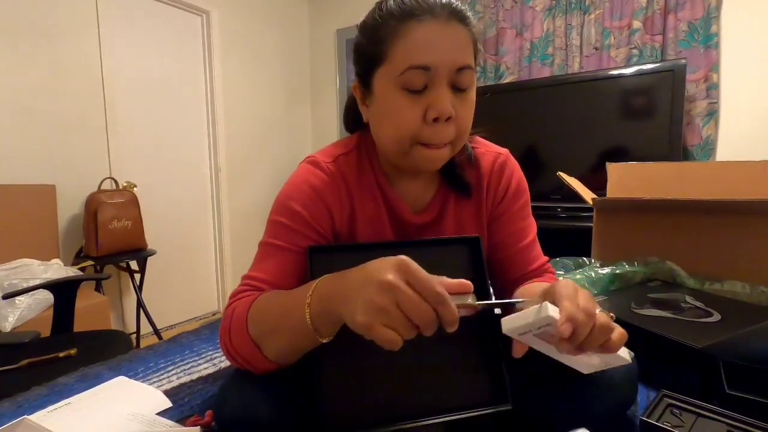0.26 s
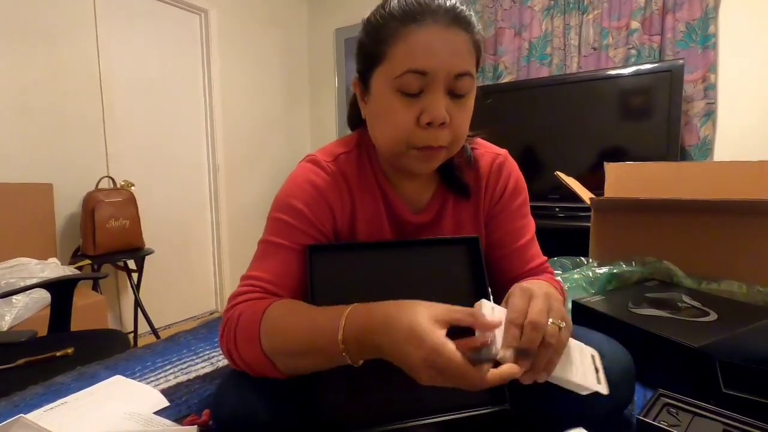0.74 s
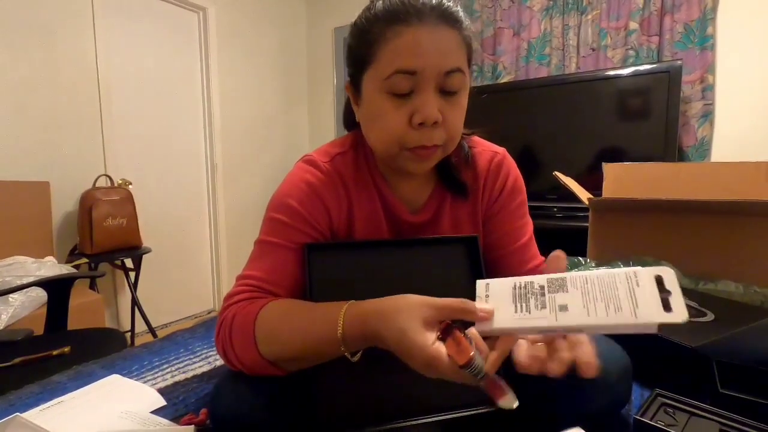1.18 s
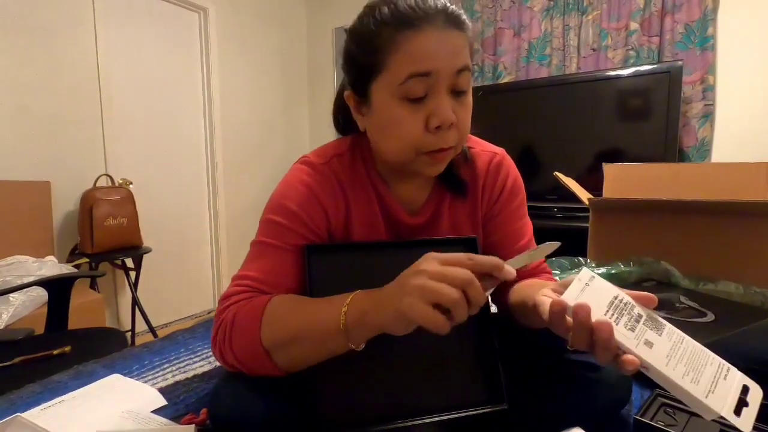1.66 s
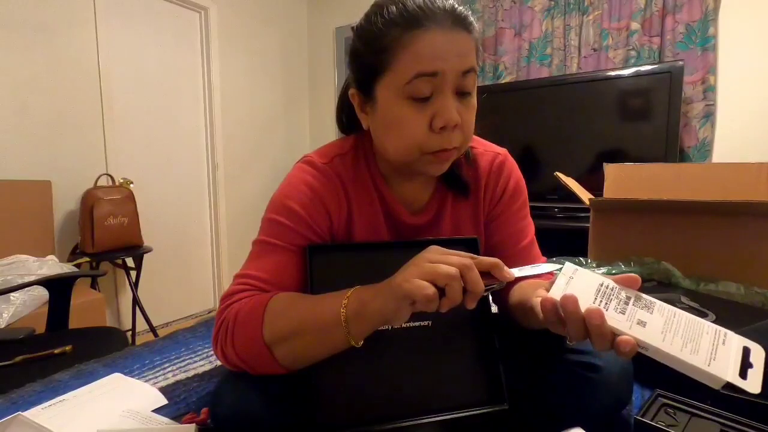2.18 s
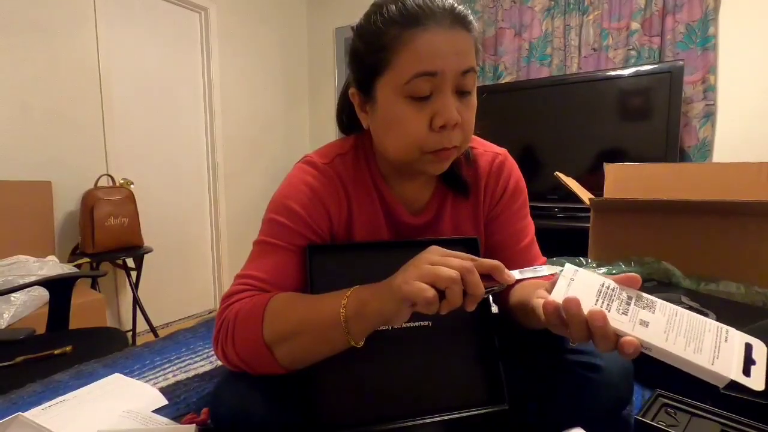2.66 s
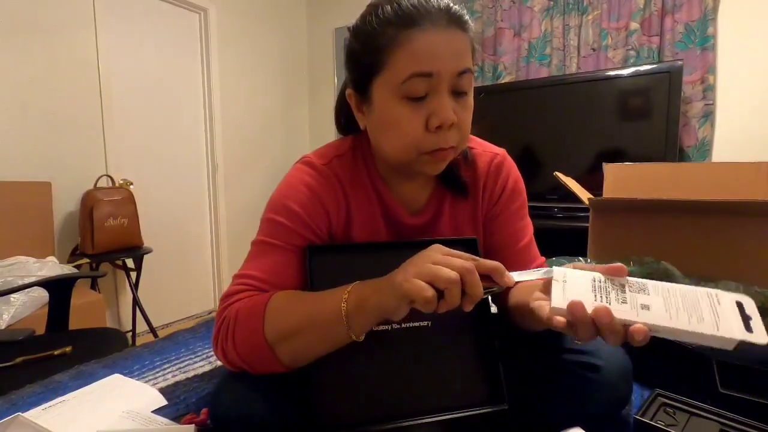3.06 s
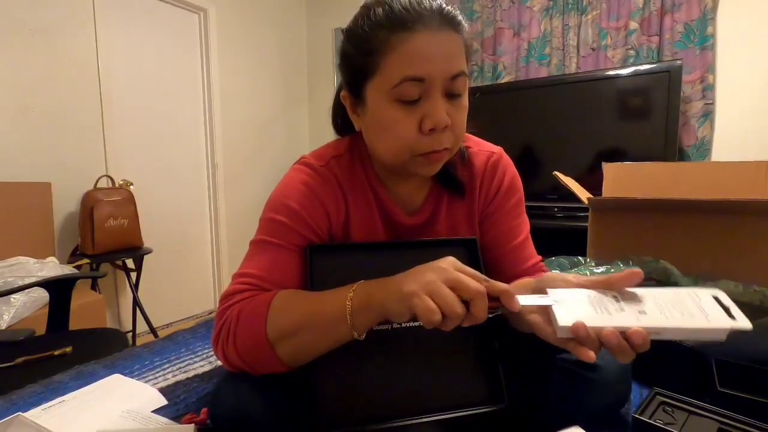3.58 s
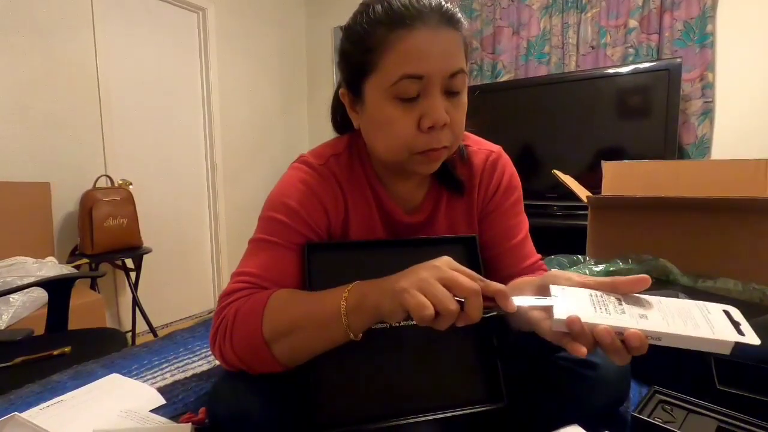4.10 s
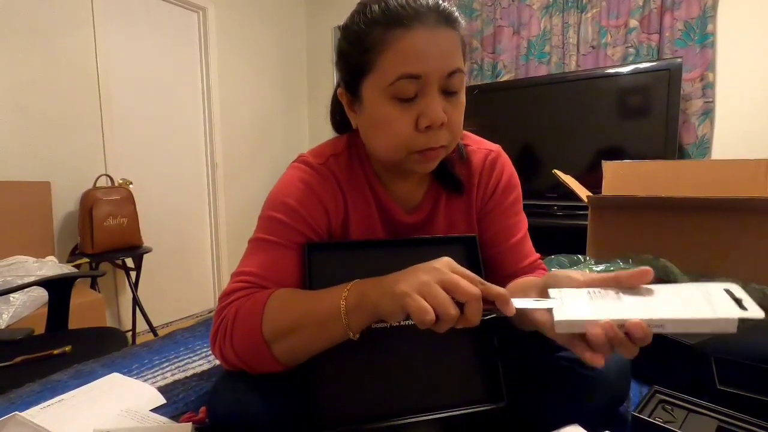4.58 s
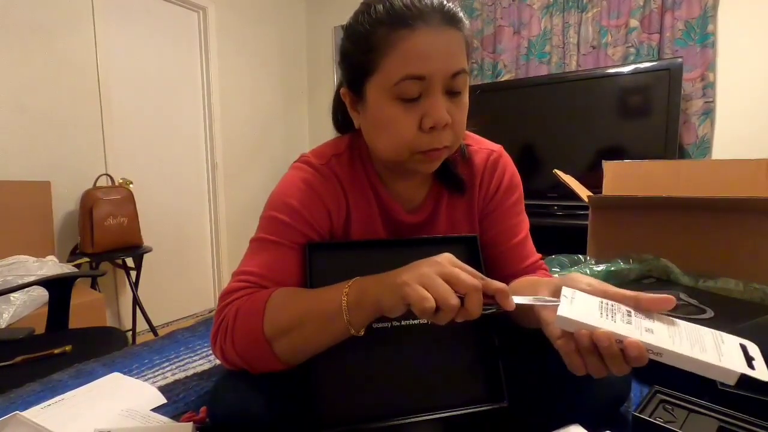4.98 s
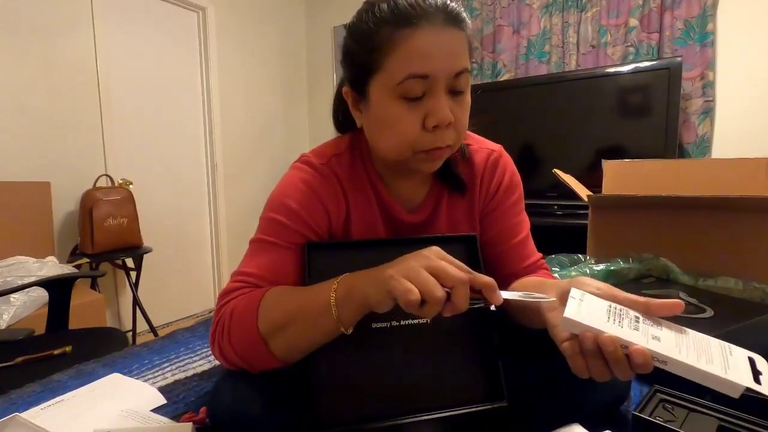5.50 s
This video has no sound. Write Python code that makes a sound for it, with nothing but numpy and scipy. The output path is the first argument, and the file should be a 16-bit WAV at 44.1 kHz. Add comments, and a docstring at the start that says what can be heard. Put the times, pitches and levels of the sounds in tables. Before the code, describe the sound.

Hands turn a small cardboard box, making dry rubs and light hollow taps, with one firmer knock as it lands in the palm. A knife tip ticks and scratches at the seal. After a lull, the scraping resumes and the seal gives with one sharp, loud, click-like rip. A few faint scratches and ticks follow. The sound is close, in a furnished room with faint hiss and low rumble.

```python
"""Opening a cardboard box

Hands turn a small box and work a knife tip along its seal in a furnished room. Friction and light
impacts excite the resonances of the hollow box; once, the seal tears in a quick run of slips.
Two close microphones receive this with brief reverberation, over faint hiss and an uneven low rumble."""
import sys
import numpy as np
from scipy import signal
from scipy.io import wavfile
from scipy.ndimage import uniform_filter1d

SR = 44100
rng = np.random.default_rng(int(sys.argv[2]) if len(sys.argv) > 2 else 0)


def persist_wave(psi):
    """Save psi, clipped to +-1, as 16-bit WAV."""
    counts = np.round(np.clip(psi, -1, 1) * 32767).astype(np.int16)
    wavfile.write(sys.argv[1], SR, np.atleast_2d(counts).T)


N = 253134
HZ = np.fft.rfftfreq(4096, 1 / SR)

# spectrum of the background hiss: f/Hz, relative level/dB
HISS_SPECTRUM = [(53, -34), (90, -7), (239, -3), (303, -10), (345, -10), (385, -12), (510, -14.5),
                 (633, -17), (998, -18), (1510, -18.5), (1640, -22), (6160, -35.5), (16000, -48.5)]
# likeness of the hiss at left and right: f/Hz, correlation
HISS_CORRELATION = [(60, -0.64), (180, 0.54), (550, 0.0072), (1650, 0.26), (4970, -0.082), (15000, -0.51)]
# slow drift of the low murmur: t/s, relative level/dB
MURMUR_DRIFT = [(0.0, -64), (0.45, -66), (1.28, -65), (1.73, -61.5), (2.46, -66), (3.66, -65.5), (4.0, -68),
                (4.91, -65), (5.18, -68), (5.74, -65)]
# envelope of the rumble: t/s, level/dB
RUMBLE_ENVELOPE = [(0.0, -58), (0.4, -63.5), (0.94, -54), (1.04, -75), (1.18, -60), (1.71, -58.5),
                   (1.74, -68), (2.24, -45), (2.75, -68), (2.93, -59), (5.74, -62)]
# spectrum of the rumble: f/Hz, relative level/dB
RUMBLE_SPECTRUM = [(8.8, -37.5), (15, -1.5), (32, 5.5), (49, 6.5), (61, -12), (76, -22), (100, -49.5),
                   (130, -46), (220, -120)]
# resonances of the box: f/Hz, width/Hz, level/dB
BOX_MODES = [(263, 450, -16), (731, 330, 3.5), (800, 110, 4.5), (912, 160, 3.5), (1095, 240, 1.5),
             (1319, 220, 1), (2140, 910, -2), (3060, 250, -4), (3544, 450, -10.5), (4330, 350, -10),
             (6050, 1200, -7.5)]
# response of the box between resonances: f/Hz, level/dB
BOX_BROADBAND = [(200, -35.5), (520, -25.5), (700, -6.5), (1500, -4), (4000, -3), (8000, -10.5),
                 (16000, -27)]
# strokes of finger or blade: peak t/s, rise/s, fall/s, level/dB,
# then hollow ring/dB, fizz/dB and rasp/dB relative to that level, rasp f/Hz
FRICTION_STROKES = [(0.335, 0.068, 0.052, -64.5, -9.5, -8, -1, 1440),
                    (0.47, 0.063, 0.086, -60.5, -15, -7, -2.5, 1890),
                    (0.69, 0.056, 0.089, -47.5, -19, -4.5, -8.5, 1780),
                    (0.79, 0.09, 0.096, -48, -20.5, -12.5, -7, 2010),
                    (0.96, 0.058, 0.096, -50.5, -17.5, -10, -10, 1720),
                    (1.045, 0.029, 0.044, -48.5, -13.5, -8, -7.5, 1530),
                    (1.16, 0.077, 0.15, -68, -4, -8, -2, 1500),
                    (1.45, 0.049, 0.047, -54.5, -10, -4.5, -5, 1830),
                    (1.55, 0.059, 0.075, -60, -5, 0, -7, 2010), (1.74, 0.11, 0.044, -69, -14, 3, -10, 2000),
                    (1.87, 0.066, 0.13, -74, 0, -10, 0, 1510),
                    (3.045, 0.033, 0.033, -60, -1.5, -13, -3, 2370),
                    (3.10, 0.042, 0.064, -55, -7.5, -10.5, -5.5, 2300),
                    (3.265, .02, .015, -60, -8, -10, -6, 2000),
                    (3.294, .012, .018, -47, -8.5, -13, -9, 1700),
                    (3.36, .06, 0.052, -52.5, -14.5, -9.5, -9.5, 1736),
                    (3.50, 0.12, 0.054, -69.5, -0.5, -7.5, -4, 1500),
                    (3.557, .025, .02, -70, 13, -5, -4, 1390),
                    (3.615, .03, 0.021, -63, -7.5, -3, -3.5, 1803),
                    (3.734, 0.015, 0.011, -54, -7.5, -10, -2, 1790),
                    (4.522, .02, .02, -68.5, -9, -22, -8, 2195),
                    (4.669, 0.033, 0.034, -59.5, 0, -8, -5.5, 1980),
                    (4.738, 0.046, 0.033, -55, -10.5, -10.5, -3, 2020),
                    (4.783, .012, 0.0091, -65.5, 3.5, -9, 6, 1940),
                    (4.99, 0.045, .04, -69.5, -6, -4.5, -6, 2000),
                    (5.07, 0.029, 0.033, -73, 8, -7, 0, 1502),
                    (5.37, 0.076, 0.067, -74, -9, -4.5, -3, 2100),
                    (5.565, .02, 0.036, -67, 4, -9, -20, 2000)]
# light impacts: t/s, ring level/dB, ring f/Hz, contact decay/ms, snap level/dB, snap f/Hz
IMPACTS = [(0.3372, -49, 1430, 2.3, -56, 3500), (0.4161, -54, 2100, 1.3, -54, 3950),
           (0.569, -47, 1810, 1.2, -45, 3920), (0.5888, -45.5, 2520, 1.7, -49, 3200),
           (0.6189, -42, 2580, 0.4, -26, 6060), (0.7272, -33, 1800, 1.8, -30, 3670),
           (1.051, -25.5, 970, 1.5, -39, 3120), (1.1538, -47, 1480, 1.9, -50, 3600),
           (1.409, -47, 720, 3.2, -33.5, 3560), (1.427, -37, 1510, 2.1, -57, 7300),
           (1.4811, -45, 780, 1.5, -43, 3400), (1.5184, -37, 2030, 1.8, -50, 6030),
           (1.541, -41, 2110, 1.1, -39.5, 3480), (1.589, -37, 1950, 0.75, -52, 3160),
           (1.6086, -74, 600, 5.3, -39, 6000), (1.6758, -72, 730, 2.5, -43.5, 6370),
           (1.712, -72, 970, 3.3, -36, 5940), (1.7501, -55, 2480, 4.1, -38, 5600),
           (1.768, -64, 955, 1.9, -48, 6200), (1.8473, -54, 1320, 1.5, -49.5, 5200),
           (1.8698, -45.5, 1450, 1.4, -51, 4100), (1.9213, -61, 2800, 3.5, -51, 7400),
           (2.24, -52, 1300, 1.3, -72, 3500), (2.7517, -52, 825, 1.3, -57, 3480),
           (3.036, -48, 2340, 1.5, -51, 4630), (3.215, -62, 950, 1.5, -54, 4600),
           (3.2767, -39, 2830, 1.5, -33, 3140), (3.2908, -35.5, 1690, 5.3, -35.5, 4040),
           (3.4844, -48.5, 1790, 1.5, -55.5, 4100), (3.514, -53, 1940, 1.5, -55, 6200),
           (3.714, -57.5, 1695, 1.5, -52, 4570), (4.0945, -75, 1586, 1.5, -56.5, 3570),
           (4.2076, -43.5, 830, 3.8, -54, 3225), (4.2719, -80, 603, 1.4, -59, 3260),
           (4.5225, -54, 2310, 1.7, -51.5, 3500), (4.6372, -59, 800, 5.1, -60, 3170),
           (4.65, -52, 890, 1.0, -41, 5210), (4.782, -47, 1900, 4, -55, 3210),
           (5.0572, -56.5, 980, 1.3, -69, 3600), (5.4171, -51, 2120, 1.8, -59, 3294),
           (5.55, -45, 790, 1, -51, 3710), (5.561, -41.5, 2080, 1.94, -40.5, 4120)]
# resonances of the blade: f/Hz, width/Hz, relative level/dB
BLADE_MODES = [(4700, 59, -3.5), (6100, 120, -3), (7300, 160, 1)]
# the box lands in the palm: t/s, level/dB, f/Hz
PALM_BUMPS = [(1.052, -43, 220), (1.409, -45, 165)]
# the seal tears in two pulls: t/s, crackle level/dB, hollow ring/dB relative to the crackle
TEAR_ENVELOPE = [(3.7365, -20, -7.5), (3.743, -18, -7.5), (3.754, -11, -5.5), (3.7584, -20, -14),
                 (3.766, -14.5, -3), (3.772, -13, -7.5), (3.778, -9.5, -10), (3.78, -25.5, -4.5),
                 (3.79, -28.5, -2)]
# phase of the direct sound, left relative to right: f/Hz, phase/rad
LEFT_PHASE_SHIFT = [(100, 0.38), (1000, -0.35), (4000, -1.3), (8000, -1.2), (16000, -1.4)]
# sound scattered by hands and lap: f/Hz, amplitude share
SCATTERED_SHARE = [(1000, 0.5), (3000, 0.2), (6000, 0.8), (12000, 1)]
# reverberation time of the room: f/Hz, T60/s
REVERB_TIME = [(150, 0.11), (700, 0.27), (2000, 0.31), (5000, 0.3), (12000, 0.25)]
# spectrum of the echoes: f/Hz, level/dB
ECHO_SPECTRUM = [(300, -2), (1000, -11), (2000, -7), (3500, -11.5), (5500, -4.5), (10000, -5.5)]


def gain_of(db):
    return 10 ** (np.asarray(db) / 20)


def unit_rms(x):
    return x / np.sqrt(np.mean(x ** 2) + 1e-20)


def with_peak(x, db):
    return gain_of(db) * x / abs(x).max()


def curve_at(points, hz):
    f, value = np.transpose(points)
    return np.interp(np.log(hz + 1), np.log(f + 1), value)


def add(mix, start_s, sound):
    part = mix[round(start_s * SR):][:len(sound)]
    part += sound[:len(part)]


def band(x, lo_hz, hi_hz):
    return signal.sosfiltfilt(signal.butter(3, [lo_hz, hi_hz], "bandpass", fs=SR, output="sos"), x)


def impulse_response(gain):
    """Minimum phase gives the promptest response that has this gain on the HZ grid."""
    log_gain = np.log(np.maximum(np.r_[gain, gain[-2:0:-1]], 1e-5))
    return np.fft.ifft(np.exp(log_gain - 1j * signal.hilbert(log_gain).imag)).real[:len(gain)]


def stereo_noise(spectrum, correlation, patchy_db, size):
    """Partial coherence: two channels share part of a random spectrum whose level varies in patches."""
    frames, hz = 4 * N // size + 5, np.fft.rfftfreq(size, 1 / SR)
    a, b, c, d, patches = rng.standard_normal((frames, len(hz), 5)).T
    patches = unit_rms(uniform_filter1d(uniform_filter1d(patches, 10, axis=0), 8, axis=1))
    shared = curve_at(correlation, hz)[:, None]
    left, independent = a + 1j * b, c + 1j * d
    spectra = np.array([left, shared * left + np.sqrt(1 - shared ** 2) * independent])
    spectra *= gain_of(curve_at(spectrum, hz)[:, None] + patchy_db * patches)
    return unit_rms(signal.istft(spectra, nperseg=size, noverlap=3 * size // 4)[1][:, :N])


def background():
    """Ambient noise: steady hiss, with slow amplitude modulation of its low murmur and of a rumble."""
    t = np.arange(N) / SR
    hiss = gain_of(-61.5) * stereo_noise(HISS_SPECTRUM, HISS_CORRELATION, patchy_db=1.15, size=2048)
    drift_db = np.interp(t, *np.transpose(MURMUR_DRIFT))
    murmur = band(hiss, 80, 500)
    hiss += murmur * (gain_of(drift_db - drift_db.mean() + 0.88) - 1)
    rumble = stereo_noise(RUMBLE_SPECTRUM, [(20, .97), (100, 1.0)], patchy_db=0.26, size=8192)
    rumble_db = np.interp(t, *np.transpose(RUMBLE_ENVELOPE))
    return hiss * gain_of([[-.3], [.3]]) + rumble * gain_of(rumble_db + [[.4], [-.4]])


def modal_power(modes):
    """Resonance peaks add in power."""
    return sum(gain_of(db) ** 2 / (1 + (2 * (HZ - f) / width) ** 2) ** 2 for f, width, db in modes)


def box_response():
    """Modal response: the resonances of the cardboard walls stand on a broadband gain."""
    return np.sqrt(modal_power(BOX_MODES) + gain_of(curve_at(BOX_BROADBAND, HZ)) ** 2)


def rubbing(box):
    """Stick-slip friction: dense, clustered slips of skin and blade on card excite the box."""
    clusters = unit_rms(uniform_filter1d(rng.standard_normal(N), 350))
    slips = rng.standard_normal(N) * gain_of(1.1 * clusters + 2.2 * rng.standard_normal(N))
    vibration = signal.oaconvolve(slips, impulse_response(box))[:N]
    bands_hz = [(2500, 5200), (550, 1200), (5200, 18000)]  # rub, hollow ring, surface fizz
    layers = np.array([unit_rms(band(vibration, *edges)) for edges in bands_hz])
    power, rasp, t = np.zeros_like(layers), np.zeros(N), np.arange(N) / SR
    for peak_s, rise_s, fall_s, db, hollow_db, fizz_db, rasp_db, rasp_hz in FRICTION_STROKES:
        near = slice(max(round((peak_s - .3) * SR), 0), round((peak_s + .3) * SR))
        from_peak = abs(t[near] - peak_s) / np.where(t[near] < peak_s, rise_s, fall_s)
        envelope = gain_of(db) * np.exp(-from_peak ** 2.5)  # a slightly squared bell
        power[:, near] += (envelope * gain_of(np.c_[[-4.6, hollow_db, fizz_db]])) ** 2
        rasp_octave = unit_rms(band(vibration[near], rasp_hz / 2 ** .5, rasp_hz * 2 ** .5))
        rasp[near] += envelope * gain_of(rasp_db) * rasp_octave
    return (np.sqrt(power) * layers).sum(0) + rasp


def fibre_burst(decay_ms, rise_ms, rough_db):
    """Transient excitation: uneven fibre snaps swell and decay exponentially."""
    t_ms = np.arange(1, 1025) * 1e3 / SR
    snaps = rng.standard_normal(1024) * gain_of(rough_db * rng.standard_normal(1024))
    return snaps * np.exp(-t_ms / decay_ms) * (1 - np.exp(-t_ms / rise_ms))


def contact_band(hz, octaves):
    """Band-limited excitation: the gain falls away on both sides of the contact pitch."""
    return 1 / (1 + (np.log2((HZ + 20) / hz) / octaves) ** 2) ** 2


def thud(hz, decay_ms):
    """Heavily damped oscillation: the whole box gives way for a cycle or two."""
    t = np.arange(2048) / SR
    return np.diff(np.sin(2 * np.pi * hz * t) * t * np.exp(-t * 1e3 / decay_ms))


def taps(box):
    """Impact excitation: each touch gives a ring, a thud and a bright snap; the palm only thuds."""
    out, push = np.zeros(N), thud(hz=281, decay_ms=1.6)
    sparkle = gain_of(curve_at([(3000, -37.5), (6000, -13), (16000, -28)], HZ))
    blade = np.sqrt(1 + 3.0 * modal_power(BLADE_MODES))
    for start_s, ring_db, ring_hz, decay_ms, snap_db, snap_hz in IMPACTS:
        touch = fibre_burst(decay_ms, rise_ms=0.18, rough_db=0.5)
        touch[4] += 0.84 * np.linalg.norm(touch)  # the first contact is one firm blow
        octaves = .66 + .02 * max(ring_db + 49.5, 0)  # harder taps ring more of the box
        ring = impulse_response(box * contact_band(ring_hz, octaves))
        snap = impulse_response(contact_band(snap_hz, octaves=0.75) * blade + sparkle)
        add(out, start_s, with_peak(np.convolve(touch, ring), ring_db))
        add(out, start_s, with_peak(push, ring_db - 16))
        add(out, start_s, with_peak(np.convolve(touch, snap), snap_db))
    for start_s, db, hz in PALM_BUMPS:
        add(out, start_s, with_peak(thud(hz, decay_ms=3), db))
    return out


def tearing(box):
    """Intermittent fracture: each jerk of the seal crackles, rings the box and pushes it in or out."""
    out, push = np.zeros(N), thud(hz=260, decay_ms=4)
    lowpass = 1 / (1 + (HZ / 1500) ** 6)
    bright_db = curve_at([(1500, -6.5), (2200, -2), (3300, 3), (4500, 1.5), (6000, -8),
                          (9000, -8.5), (16000, -3.5)], HZ)
    # the gripped walls give little bass
    walls_db = curve_at([(110, -25), (220, -5), (480, -11.5), (650, -5), (1200, 0)], HZ)
    crackle = impulse_response(box * (1 - lowpass) * gain_of(bright_db))
    ring = impulse_response(box * lowpass * gain_of(walls_db))
    times, *levels_db = np.transpose(TEAR_ENVELOPE)
    jerks, jerks_per_s = 40, 500
    lateness, strength, direction = rng.random((jerks, 3)).T
    for k, start_s in enumerate(times[0] + (np.arange(jerks) + lateness * .5) / jerks_per_s):
        jerk = fibre_burst(decay_ms=1.5, rise_ms=.35, rough_db=2.04)
        crackle_db, hollow_db = (np.interp(start_s, times, db, right=-150) for db in levels_db)
        crackle_db += 2 * strength[k] - 1
        ring_db = crackle_db + hollow_db
        add(out, start_s, with_peak(np.convolve(jerk, crackle), crackle_db))
        add(out, start_s, with_peak(np.convolve(jerk, ring), ring_db))
        add(out, start_s, np.sign(direction[k] - .5) * with_peak(push, ring_db - 31))
    return out


def direct_sound(x):
    """Path difference and scattering: the left lags and is weaker; moving hands scatter mainly treble."""
    hz, t, spectra = signal.stft(x, SR, nperseg=256, noverlap=192)
    draws = rng.standard_normal((2, len(t), 2, len(hz))).transpose(0, 2, 3, 1)
    real, imag = (unit_rms(uniform_filter1d(uniform_filter1d(v, 3, axis=1), 12, axis=2)) for v in draws)
    share = np.clip(curve_at(SCATTERED_SHARE, hz), 0, .95)[:, None]
    straight = np.array([np.exp(1j * curve_at(LEFT_PHASE_SHIFT, hz)), np.ones(len(hz))])[..., None]
    transfer = np.sqrt(1 - share ** 2) * straight + share * (real + 1j * imag) / np.sqrt(2)
    stereo = signal.istft(spectra * transfer, SR, nperseg=256, noverlap=192)[1][:, :N]
    return stereo * gain_of([[-1.1], [1.1]])


def echo_tail():
    """Absorption: sparse reflections of random sign decay at a rate that depends on frequency."""
    echoes, slots = np.zeros((2, SR // 2)), np.arange(140, SR // 2 - 20, 16)
    arrivals = slots + rng.integers(0, 16, (2, len(slots)))
    np.put_along_axis(echoes, arrivals, rng.choice([-1., 1.], arrivals.shape), 1)
    hz, t, spectra = signal.stft(echoes, SR, nperseg=256)
    # close microphones receive low echoes alike
    shared = curve_at([(300, 0.82), (1000, 0.55), (3000, 0.37), (8000, .1)], hz)[:, None]
    spectra[1] = shared * spectra[0] + np.sqrt(1 - shared ** 2) * spectra[1]
    spectra *= gain_of(-60 * t / curve_at(REVERB_TIME, hz)[:, None])
    norm = np.linalg.norm(signal.istft(spectra[0], SR, nperseg=256)[1])
    spectra *= gain_of(curve_at(ECHO_SPECTRUM, hz)[:, None])
    return signal.istft(spectra, SR, nperseg=256)[1] / norm


def reverberation(x):
    """Time-varying reflection: as the hands move, the sound passes in turn through three echo sets."""
    turn_hz = 9
    phase = 2 * np.pi * turn_hz * np.arange(N) / SR
    shares = [np.sqrt(2 / 3) * np.cos(phase + k * np.pi / 3) for k in range(3)]
    return sum(signal.fftconvolve((x * share)[None], echo_tail(), axes=1)[:, :N] for share in shares)


def scene():
    """Superposition: the direct sound of the handling, its reverberation and the background add."""
    box = box_response()
    handling = rubbing(box) + taps(box) + tearing(box)
    return direct_sound(handling) + reverberation(handling) + background()


def record(dry):
    """Band limiting: a linear-phase low-pass filter removes the highest treble."""
    cutoff_hz = 15900
    lowpass = signal.firwin(511, cutoff_hz, window=("kaiser", 9), fs=SR)
    return signal.oaconvolve(dry, lowpass[None], "same")


dry = scene()
out = record(dry)
persist_wave(out)
```